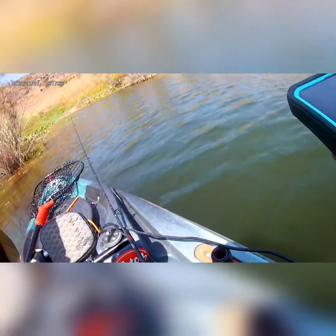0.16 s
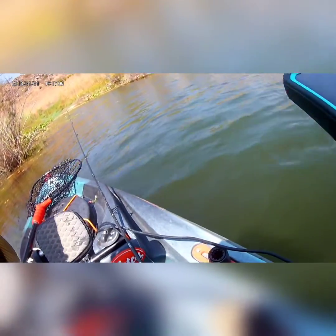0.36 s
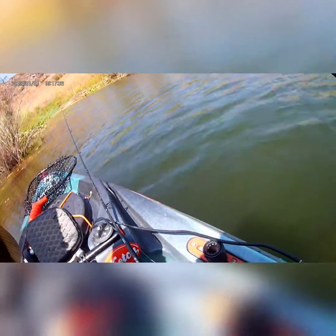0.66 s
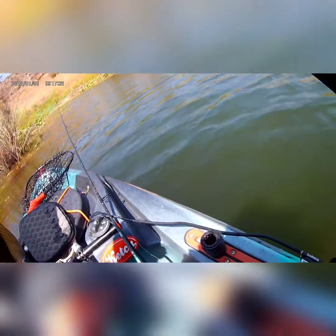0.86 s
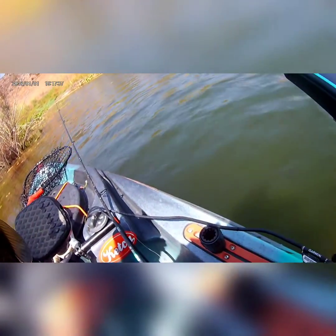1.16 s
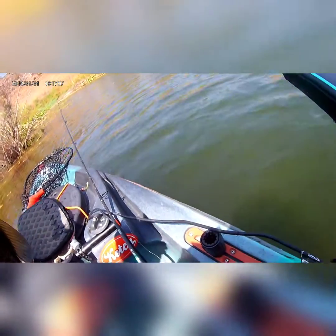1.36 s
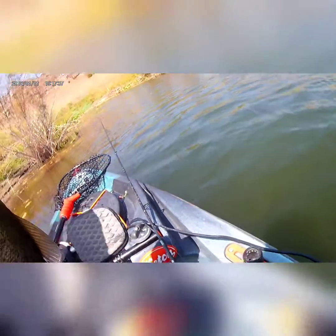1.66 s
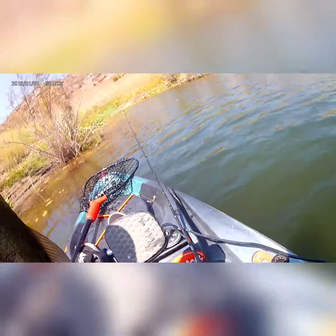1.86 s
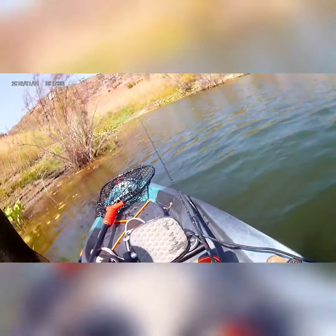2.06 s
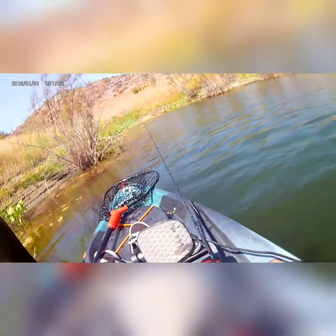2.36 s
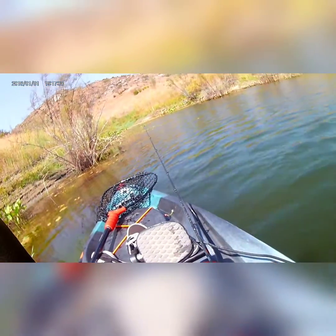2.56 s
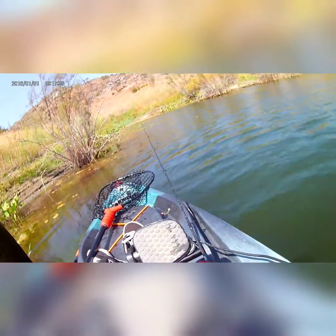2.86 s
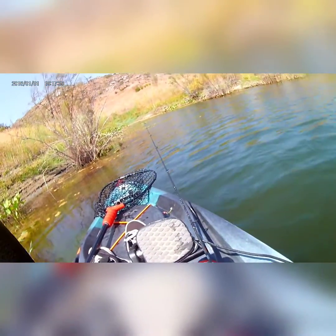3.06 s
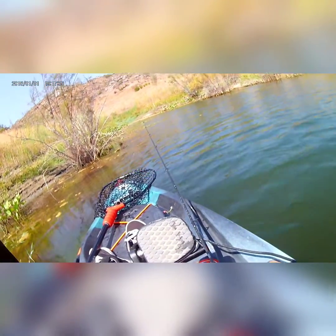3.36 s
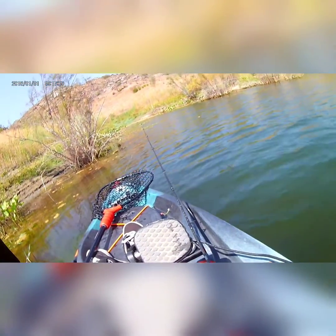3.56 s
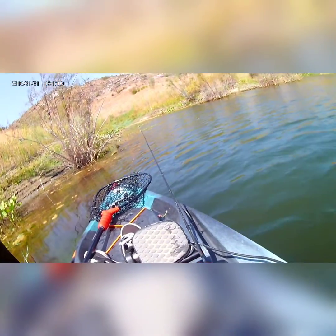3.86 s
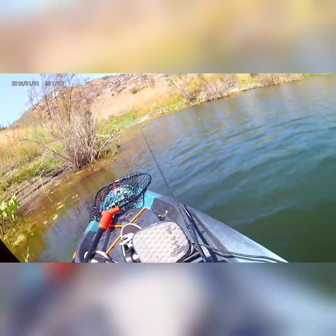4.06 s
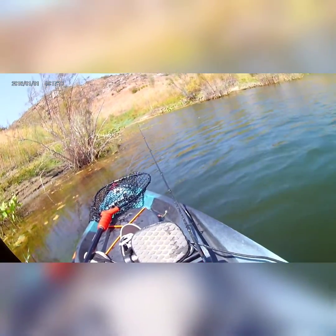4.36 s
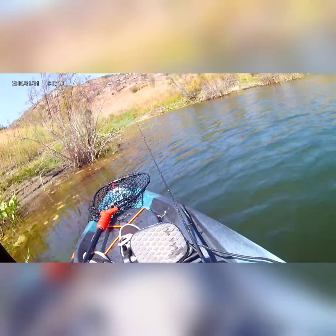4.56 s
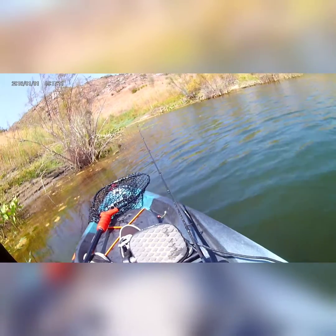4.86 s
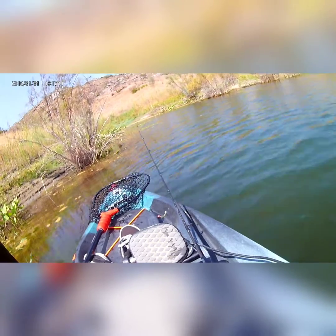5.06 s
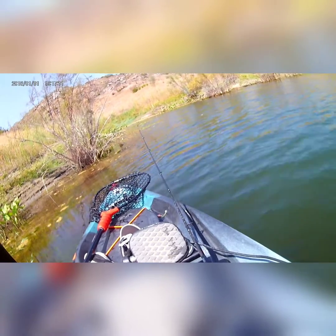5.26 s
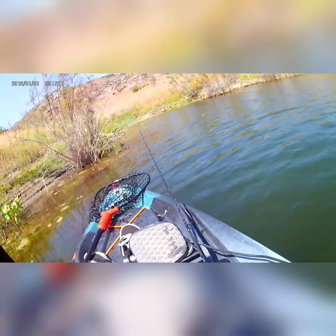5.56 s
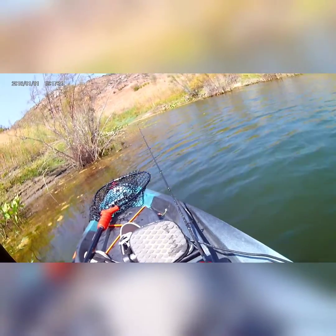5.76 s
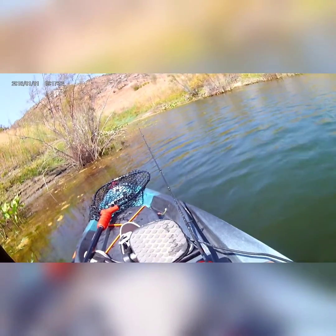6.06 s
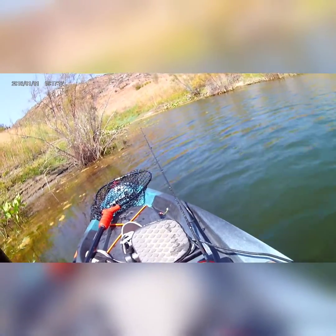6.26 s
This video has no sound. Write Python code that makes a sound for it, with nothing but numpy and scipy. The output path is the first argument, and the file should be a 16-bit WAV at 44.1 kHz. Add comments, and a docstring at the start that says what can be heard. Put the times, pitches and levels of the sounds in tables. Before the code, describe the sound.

Gear bumps and scrapes against a hollow plastic boat, heard dull and close through a sealed case, with sharp clacks over soft wind rumble.

```python
"""On a plastic kayak, gear and straps are handled, heard mostly through the shell of a closed camera case.
Knocks thump the hull and ring the case: each is a burst of fading tones, with a tick and a crack on top.
Scrapes drive the same case with uneven slips of noise, and a strap squeaks as a thin wavering tone.
A light breeze of shaped noise rumbles underneath; the case muffles the treble of the handling steeply."""
import sys
import numpy as np
from scipy import signal
from scipy.fft import rfft, irfft
from scipy.io import wavfile
from scipy.ndimage import uniform_filter1d

SR = 44100
rng = np.random.default_rng(int(sys.argv[2]) if len(sys.argv) > 2 else 0)


def inscribe(sig):
    """Save sig as 16-bit PCM at rate SR to the path in sys.argv[1].

    A 1-D sig is mono; a 2-D sig holds one channel per row.
    Samples are clipped to [-1, 1] before scaling.
    """
    pcm = np.round(np.clip(np.atleast_2d(sig).T, -1, 1) * 32767)
    wavfile.write(sys.argv[1], SR, pcm.astype(np.int16))


N = 283104  # length in samples

# The breeze on the case. Each row: time in seconds, rumble level in dB before buffeting and flicker.
BREEZE_GUSTS = [(0.0, -57), (.93, -60), (1.27, -59.5), (1.54, -48.5), (1.75, -55), (1.97, -58.5),
                (2.57, -62), (2.91, -62), (3.36, -60), (3.81, -61.5), (4.4, -60.5), (4.9, -61.5),
                (5.83, -62), (6.04, -56), (6.2, -62.5), (6.42, -60.5)]
# The tone colour of the breeze. Each row: frequency in Hz, relative density in dB per Hz.
BREEZE_COLOUR = [(15, -48.5), (25, -12), (59, -1.5), (96, -3), (216, -7), (266, -11), (298, -11.5),
                 (423, -13), (521, -17.5), (1020, -21.5), (1410, -26.5), (2830, -34.5), (6360, -46.5),
                 (8270, -52.5), (14000, -120)]
# Faint strap squeaks. Each row: start in seconds, length in seconds, starting pitch in Hz before the
# waver, starting level in dB before the roughness.
STRAP_SQUEAKS = [(0.057, 0.035, 1480, -72), (0.424, .02, 1610, -68), (0.456, 0.12, 1700, -69),
                 (0.813, .02, 1580, -60), (0.845, 0.044, 1600, -66)]
# Scrapes over shell and straps. Each row: start, firmest moment and end in seconds (sorted to shape the
# pressure), case level in dB when firmest, levels of the low, middle and top lid modes in dB relative to
# the case, centre of the rubbed spot in Hz, damping factor, lid pitch factor under the grip.
# A row that ends well before it starts makes no sound.
SCRAPE_STROKES = [(0.587,0.658,0.75,-56,-12,-18,-15.5,704,2.4,0.91),(0.772,.78,0.8,-63,-9,-13,-9,810,1.9,0.94),(0.796,0.852,0.92,-59,-5.5,-12,-11.5,810,1.8,0.92),
                  (0.911,0.915,0.96,-54.5,-8,-16,-18,660,2,0.93),(0.948,0.953,0.99,-54,-4,-18,-16,670,1.9,0.93),
                  (0.996,1.055,1.153,-59.5,-11,-19,-21,750,2.4,0.96),(1.492,1.527,1.72,-58,-16,-17,-28,600,1.7,1),(1.542,1.55,1.558,-61,-9,-5,-15,700,1.5,1),
                  (1.576,1.601,1.63,-42.5,-8,-14.5,-15,850,1.8,1.04),(1.594,1.61,1.64,-60,-20,-25,-26,800,1.4,1),(1.632,1.65,1.77,-66.5,-11,-26,-29,700,1.5,0.95),
                  (2.895,2.917,3.09,-38,-17,-12,-18.5,650,1.3,1),(2.958,3.018,3.1,-60,-8,-8,-15,720,1.2,0.87),
                  (3.027,3.057,3.093,-58.5,10.5,5.5,2,700,0.55,0.99),(3.064,3.098,3.13,-57.5,9.5,8.5,2,700,0.58,1.01),(3.104,3.12,3.17,-57,1.5,-11,-14,600,0.93,0.98),(3.191,3.201,3.27,-53.5,-4.5,-12,-9.5,800,1.3,0.97),(3.215,3.24,3.3,-47.5,-7.5,-13,-14,754,1.5,1.02),
                  (3.3,3.3,3.32,-52,-12,-15,-15,880,1.1,0.89),(3.317,3.325,3.365,-49.5,-13,-10.5,-14,800,1.1,0.96),(3.368,3.373,3.53,-59.5,-8.5,-26,-34,750,1.6,1.09),
                  (3.455,3.597,4.1,-69,-11.5,-28,-28,596,1.6,1.14),(4.213,4.243,4.27,-54,-6.5,-12.5,-18.5,700,1.3,1.02),(4.28,4.304,4.31,-63.5,-7,-9.5,-14,700,1.4,.97),
                  (4.441,4.456,4.57,-60,-15,-21,-22,650,1.8,0.93),(4.578,4.603,4.6,-54,-4,-5,-18,650,1.3,0.94),
                  (4.63,4.732,4.81,-63.5,-9.5,-24,-21,650,1.7,1),(5.095,5.126,5.15,-57.5,-11,-10.5,-10,847,1.3,0.9),(5.141,5.165,5.195,-58,-16,-14,-13,846,1.2,1),
                  (5.87,5.89,6.07,-65,-13,-15,-23,800,1.3,1.06),(5.922,5.934,6.2,-62,-6.5,-19,-23,875,0.92,1.03),(6.014,6.024,6.06,-66,3.5,-10,-20,800,1.6,1.1),
                  (6.053,6.1,6.15,-52,-16,-24,-27,640,0.87,1.13),(6.18,6.183,6.27,-66,-8,-24,-30,650,1.2,1.06),
                  (6.253,6.27,6.282,-67,2.5,-20,-30,700,0.78,1.03),(6.278,6.293,6.37,-53,-19,-33,-36,980,0.74,1),(6.303,6.31,6.33,-48,-17.5,-35.5,-36,800,0.58,1.04),
                  (6.343,6.357,6.16,-59,-11,-26,-24,1000,1.1,1),(6.37,6.37,6.42,-58.5,-13,-23,-23,744,1.7,0.96)]
# Knocks. Each row: time in seconds, peak level of the case ring in dB, levels of thump, tick and crack in
# dB relative to that ring, centres of thump, ring and crack in Hz, ring length factor.
KNOCK_BLOWS = [(.307,-51,1,-20,-36,228,500,2400,3.9),(.406,-51.5,8,-12,-18,120,408,2700,1.5),
               (.473,-32.5,-4,-25,-47,317,670,2900,0.53),(0.577,-52,6,-2.5,0,104,447,4200,1),
               (.620,-32.5,-3.5,-9.5,-13,121,845,2920,0.53),(0.6204,-56,-20,-10,3,120,850,4700,0.5),(.714,-43.5,-25,-12,-33,90,690,2400,0.7),
               (.777,-50,-10,-11,-11.5,139,1130,4550,0.97),(0.799,-49.5,-12,-11,-22,140,940,3300,1.5),
               (.846,-53,7,0,-10,100,1050,4000,1.4),(.916,-43,0,-5,-16,89,467,4700,0.7),
               (.956,-38.5,-7,0,-15,140,425,3000,0.45),(1.037,-49,-10,-23,-27,90,670,3150,0.79),
               (1.059,-36.5,-3,-17,-28,105,825,2450,0.47),(1.077,-44.5,-7.5,-24,-33,100,956,2600,0.65),
               (1.241,-49.5,3.5,-23,-25,109,930,3200,0.99),(1.379,-39,-4.5,-11,-11.5,98,796,2630,0.98),(1.3795,-61.5,-20,-10,6.5,98,796,4700,0.8),
               (1.524,-41,9,-22,-27,156,400,2900,0.48),(1.554,-47,0,-5,-7,145,886,2700,.85),
               (1.600,-20,-13,-6.5,-15.5,380,990,2930,0.65),(1.602,-26.5,-6,-11,-4,170,960,4900,0.94),
               (1.862,-54,-4,-5.5,-13,90,610,2600,1.5),(2.114,-72,-20,-20,8,150,600,5700,.5),(2.504,-46,4,-29,-40,151,423,2900,0.63),
               (2.9036,-19.5,-0.5,-17,-27,91.5,640,2700,0.47),(2.906,-19,-8,-7,-5.5,180,790,3300,0.58),(2.9084,-14,-1,-19,-21,200,800,2400,0.62),
               (2.9136,-18.5,-16.5,-11.5,-5,350,436,3200,1.6),(2.923,-19,-4,-9,-10,147,686,2600,0.64),
               (2.927,-17.5,-3,-15,-23,240,595,4200,1.1),(2.94,-24.5,-5,-12,-1.5,260,611,3080,1.4),
               (2.9506,-23,-14,-7,-0.5,330,413,2900,1.1),(2.9605,-27,-6,-7,-2,350,900,3180,1.6),
               (2.970,-28.5,-14,-19,-9,90,730,2900,1.7),(2.981,-30.5,0,-18,-27,200,600,3400,0.81),(2.984,-17.5,-1,-18,-26,290,700,3400,0.71),
               (2.992,-26,-5,-20,-27,100,725,3350,1.4),(3.004,-33.5,-32,-7,-21,120,680,2500,.73),
               (3.017,-34,-34,-24,-17,280,704,2900,0.87),(3.040,-40,-16,-15,-11,150,700,2950,1),
               (3.221,-32,-4,-24,-20,140,690,3100,1.9),(3.236,-33,1,-20,-32,165,759,3150,0.88),
               (3.246,-22,-0.5,-15.5,-27,295,416,2400,0.42),(3.251,-25,-12,-16,-26,260,410,2400,0.45),
               (3.2556,-25,-4.5,-18,-13,90,587,5030,0.68),(3.265,-32.5,-8,-20,-22,210,869,2500,1.2),
               (3.276,-29.5,-8,-27,-31,135,660,3600,0.52),(3.297,-31.5,-15,-15,-15,320,767,4700,2.6),
               (3.338,-33.5,-8,-7,-22,300,700,2600,.6),(3.341,-28.5,-5.5,-14.5,-26,348,500,2450,0.55),(3.347,-30.5,6,-17,-22,114,465,2400,0.62),
               (3.357,-31.5,-34,-14,-15,130,678,2700,0.86),(3.366,-41.5,-19,-1.5,-8,89.99,820,3100,1.1),
               (3.397,-31.5,-34,-19,-33,100,730,2400,0.54),(3.469,-49,-16,-5.5,-18,270,453,2400,0.54),
               (3.490,-48.5,3,-16,-29,230,460,2400,4.1),(3.670,-47.5,-15,-9,-29,90,409.9,4200,0.64),
               (3.825,-44,-12,-18,-21,140,422,2840,0.37),(3.945,-46,-12,-12.5,-23,330,440,2500,0.35),
               (4.233,-24,-2,-15,-36,187,450,2700,0.41),(4.241,-27,-9.5,-21,-27,95,690,2400,1.67),
               (4.304,-41,-13,-12.5,-35,291,503,3000,0.58),(4.341,-47.5,-23,-11,-29.5,300,500,2900,0.31),
               (4.455,-50,-11,-8,-15.5,90,780,3800,0.49),(4.477,-47,-13,-12,-33,90,431,3640,0.76),
               (4.586,-23.5,-3,-17.5,-30,200,557,3100,0.37),(4.592,-31.5,-9.5,-17,-13.5,200,704,2800,1.37),
               (4.599,-39.5,3,-8,-10,134,590,2902,0.73),(4.652,-38,-1,-10.5,-42,150,570,3300,0.65),
               (4.767,-49,-18,-25.5,-33,100.7,425,2720,0.35),(5.112,-38,-29,-6.5,-9,130,890,2460,0.67),
               (5.960,-38.5,1.5,-6.5,-24,260,647,2400,0.52),(6.048,-41.5,-5,-7,-18,250,404,2400,0.94),
               (6.068,-51,-7,-5,-25,250,700,2400,.8),(6.086,-43,1.5,-10,-37,325,610,3900,2.9),(6.101,-32.5,-14,-18,-27,285,402,2400,1),
               (6.116,-34.5,-3.5,-18,-27,215,431,4000,1.1),(6.134,-32.5,-3.5,-10.5,-18.5,350,400,3700,1.17),
               (6.1413,-33,-12,-32,-19,240,674,2700,1.1),(6.157,-45,-4,-27,-15,205,678,4000,0.78),
               (6.2393,-37,-4,-19,-36,329.6,600,2400,0.86),(6.271,-53,-7,1,-28,206,748,2450,1.59),
               (6.312,-46,-8,-41,-40,330,772,2700,2.9),(6.356,-42.5,-12,-20,-30,220,471,2500,0.98),
               (6.377,-43,-3,-6,-20,185,770,2500,0.75)]
# Modes: the tones at which a part naturally rings, here for the hull, the case and its lid.
# Each row: frequency in Hz, relative level in dB, time to fade by 60 dB in seconds, all for an
# undisturbed part; single sounds shift them.
HULL_MODES = [(88.9, -5, 0.22), (148.4, -2.5, 0.096), (184.5, 2.5, 0.08), (253, 3.5, 0.085),
              (314.7, 1, 0.1)]
CASE_MODES = [(398, -3.5, 0.036), (488, -6, 0.053), (606, -4, 0.021), (710.3, -4.5, 0.047), (814, 0, 0.021),
              (918, 2, 0.024), (1074, 2.5, 0.011), (1270, -2.5, 0.013)]
LID_MODES = [(1543, 1, 0.018), (1832, -11.5, 0.024), (1993, -11.5, 0.022), (2450, -1, 0.02),
             (2895, -4.5, 0.035), (3247, -3, 0.025), (3740, -8.5, 0.015), (4085, -8, 0.046),
             (4570, -3, 0.037), (4765, -4.5, 0.031), (5050, -6.5, 0.02), (5700, -16.5, 0.009)]

MUFFLE_HZ, TOP_HZ = 6140, 15740  # treble limits of the closed case and of the whole sound
HISS_DB = -93.5  # level of the steady hiss
CRACK_T60_S = 0.005472  # short, as the touching part chokes the top modes
CHATTER_MS = 3.043  # spread of the touches in a case ring or tick; thump and crack use a part of it
LAND_DB, LIFT_DB = -10, -13.5  # scrape level at the first and last of its times, relative to firmest
SAG_HZ_PER_S, FADE_DB_PER_S = 1500, 34  # how a squeak falls in pitch (before the waver) and level
SOFT_OCTAVES_PER_DB = 0.03  # a duller touch (weaker tick) wakes fewer case modes


def undb(db):
    """Turn decibels into a plain factor."""
    return 10 ** (np.asarray(db) / 20)


def unit(x):
    """Scale to an rms of 1."""
    return x / np.sqrt(np.mean(x ** 2))


def walk(rate):
    """Wander at random: levels held for 1 / rate seconds, then smoothed twice; rms 1."""
    hold = int(SR / rate)
    steps = np.repeat(rng.standard_normal(N // hold + 1), hold)
    smooth = uniform_filter1d(uniform_filter1d(steps, hold), hold)
    return unit(smooth[:N])


def gate(start, end, edge_s):
    """Fade a stretch in and out along straight slopes."""
    t = np.arange(N) / SR
    return np.clip(np.minimum(t - start, end - t) / edge_s + .5, 0, 1)


def breeze():
    """Half-octave bands of noise; gusts lift the bass most, and each band flickers by itself."""
    s, gust_db = np.transpose(BREEZE_GUSTS)
    gust_db = np.interp(np.arange(N) / SR, s, gust_db)
    calm_db = np.median(gust_db)
    f = np.maximum(np.arange(N // 2 + 1) * SR / N, 1)
    colour_hz, colour_db = np.transpose(BREEZE_COLOUR)
    colour = undb(np.interp(np.log(f), np.log(colour_hz), colour_db))
    air = colour * rfft(rng.standard_normal(N))
    bass_level = np.std(irfft(air * (f < 350), N))
    out, buffet = 0, walk(14)
    for k in range(-1, 19):
        band = np.cos(np.pi / 2 * np.clip(2 * np.log2(f / 30) - k, -1, 1)) ** 2
        centre_hz = 30 * 2 ** (k / 2)
        gust_share = 1 / (1 + (centre_hz / 900) ** 1.3)
        db = gust_share * (gust_db - calm_db + 2.6 * buffet + 2.13 * walk(22.08))
        db = db + 1.1 * walk(6.3)
        out = out + undb(db) * irfft(air * band, N)
    return out / bass_level * undb(calm_db)


def squeaks():
    """A thin wavering tone that sags and fades as the strap slackens, roughened by the slipping."""
    t, waver, out = np.arange(N) / SR, 1 + .014 * walk(120), 0
    for start, length, hz, db in STRAP_SQUEAKS:
        age = np.clip(t - start, 0, length)
        pitch = (hz - SAG_HZ_PER_S * age) * waver
        tone = np.sqrt(2) * np.sin(2 * np.pi * np.cumsum(pitch) / SR)
        out = out + gate(start, start + length, 0.022) * undb(db - FADE_DB_PER_S * age) * tone
    roughness = undb(3.5 * walk(150))
    return roughness * out


def resonate(x, modes, damp, sign):
    """Drive the modes steadily; a hand on the shell damps them; like signs leave dark valleys between."""
    out = 0
    for k, (hz, db, t60) in enumerate(modes):
        r = 1000. ** (-damp / (t60 * SR))  # what is left of the ringing after one sample
        w = 2 * np.pi * hz / SR
        mode = signal.lfilter([np.sin(w)], [1, -2 * r * np.cos(w), r * r], x)
        out = out + sign ** k * undb(db) * mode
    return unit(out)


def scrapes():
    """Stick-slip: dense uneven slips over smooth friction shake case and lid; each part flutters by itself."""
    out, grip, rubs, edge_s = np.zeros(N), walk(70), [], .012
    for _ in range(4):  # one rub for the case and one for each of three groups of lid modes
        slips = (rng.random(N) < 1400 / SR) * rng.standard_normal(N)  # about 1400 slips a second
        slips = slips * undb(1.5 * rng.exponential(size=N))
        friction = .9 * rng.standard_normal(N)
        flutter = undb(.6 * grip + 1.5 * walk(150))
        rubs.append((unit(slips) + friction) * flutter)
    for start, firmest, end, db, low_db, mid_db, top_db, spot_hz, damp, pitch in SCRAPE_STROKES:
        span = slice(int((start - edge_s) * SR), int((end + edge_s) * SR))
        times = np.sort([start, firmest, end])
        stroke_db = db + np.interp(np.arange(N)[span] / SR, times, [LAND_DB, 0, LIFT_DB])
        # case modes far from the rubbed spot's centre speak less
        case = [(hz, g - 6 * (np.log2(hz / spot_hz) / 0.87) ** 2, t60) for hz, g, t60 in CASE_MODES]
        lid = [(hz * pitch, g, t60) for hz, g, t60 in LID_MODES]
        groups = (case, lid[:3], lid[3:6], lid[6:])
        levels_db = (0, low_db, mid_db, top_db)
        damp_factors, signs = (1.03, 0.77, 0.93, 0.92), (-1, 1, 1, 1)
        shake = 0
        for modes, rub, g, d, sign in zip(groups, rubs, levels_db, damp_factors, signs):
            shake = shake + undb(g) * resonate(rub[span], modes, d * max(damp, .3), sign)
        out[span] += gate(start, end, edge_s)[span] * undb(stroke_db) * shake
    return out


def ring(modes, chance, centre_hz, octaves, stretch, detune, scatter_db, push_s, together=.8, rise_s=0.000092):
    """One blow: modes near the struck spot's centre speak most, each detuned, some in opposite phase."""
    hz, db, t60 = np.transpose(modes)
    t = np.arange(int(.11 * SR))[:, None] / SR
    count = len(hz)
    distance = np.log2(hz / centre_hz) / octaves
    gain = undb(db + scatter_db * chance[count:2 * count] - 5.7 * distance ** 2)
    gain = gain * np.sign(chance[2 * count:3 * count] + together)
    tones = np.sin(2 * np.pi * hz * (1 + detune * chance[:count]) * t)
    fade = 1000. ** (-t / (t60 * max(stretch, .1)))
    y = (gain * tones * fade).sum(axis=1)
    y = y * (1 - np.exp(-t[:, 0] / max(rise_s, 1 / SR)))  # the ring builds up as the contact spreads
    return np.convolve(y, np.hanning(3 + int(push_s * SR)))[:len(t)]  # a longer push is duller


def chatter(y, length_ms, chance):
    """A loose part touches several times within one blow; peak 1."""
    touches = np.zeros(int(.03 * SR))
    touches[0] = 1
    places = np.abs(chance[:6]) * max(length_ms, 0) * SR / 1000
    places = np.minimum(places, len(touches) - 1).astype(int)
    np.add.at(touches, places, 0.38 * chance[6:12] * np.exp(-places / SR / 0.0057))
    y = signal.fftconvolve(y, touches)[:len(y)]
    return y / np.abs(y).max()


def knocks():
    """Each blow thumps the hull, rings the case, ticks the lid and cracks briefly on its top modes."""
    out = np.zeros(N + SR)
    chance = rng.standard_normal((len(KNOCK_BLOWS), 130))
    crack_modes = [(hz, g, CRACK_T60_S) for hz, g, _ in LID_MODES[2:]]
    for blow, c in zip(KNOCK_BLOWS, chance):
        s, db, thump_db, tick_db, crack_db, thump_hz, ring_hz, crack_hz, stretch = blow
        case_octaves = max(0.87 + SOFT_OCTAVES_PER_DB * tick_db, .3)
        case = ring(CASE_MODES, c, ring_hz, case_octaves, stretch, detune=0.036, scatter_db=2.5,
                    push_s=0.00042, together=1.4, rise_s=0.00039)
        hull = ring(HULL_MODES, c[24:], thump_hz, 0.89, stretch, detune=0.092, scatter_db=3.0,
                    push_s=0.0013, together=1.6)
        tick = ring(LID_MODES[:3], c[40:], 1650., 1.5, stretch, detune=.04, scatter_db=3.5,
                    push_s=.0002, rise_s=.0005)
        crack = ring(crack_modes, c[44:], crack_hz, 0.41, 1, detune=0.038, scatter_db=1.0,
                     push_s=.0001, together=.1, rise_s=0.00097)
        y = chatter(case, CHATTER_MS, c[74:])
        y = y + undb(thump_db) * chatter(hull, 0.6 * CHATTER_MS, c[86:])
        y = y + undb(tick_db) * chatter(tick, CHATTER_MS, c[98:])
        y = y + undb(crack_db) * chatter(crack, .3 * CHATTER_MS, c[110:])
        i = int(s * SR)
        out[i:i + len(y)] += undb(db) * y
    return out[:N]


def scene():
    """Handling sounds lose their top through the closed case; the hull is too small for deep bass."""
    handling = knocks() + scrapes() + squeaks()
    muffle = signal.butter(7, MUFFLE_HZ, fs=SR, output="sos")
    bass_cut = signal.butter(2, 70., "high", fs=SR, output="sos")
    shell = signal.sosfilt(bass_cut, signal.sosfilt(muffle, handling))
    return (shell + breeze())[None]


def record(dry):
    """A faint steady recorder hiss, plus a little noise that follows the loudness; the top is cut."""
    loudness = uniform_filter1d(uniform_filter1d(np.abs(dry), 900, axis=1), 900, axis=1)
    following_level = undb(-41.0) * loudness
    noise = (undb(HISS_DB) + following_level) * rng.standard_normal(dry.shape)
    top_cut = signal.ellip(10, .2, 60, TOP_HZ, fs=SR, output="sos")
    return signal.sosfilt(top_cut, dry + noise)


dry = scene()
out = record(dry)
inscribe(out)
```